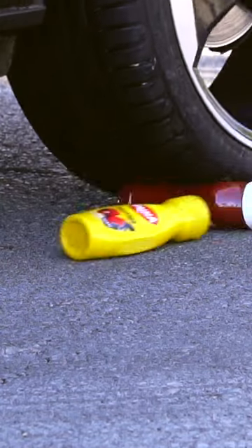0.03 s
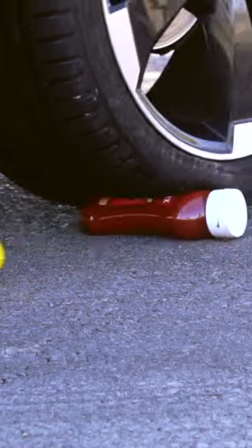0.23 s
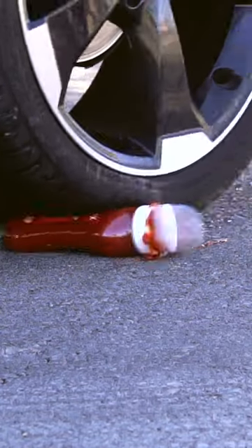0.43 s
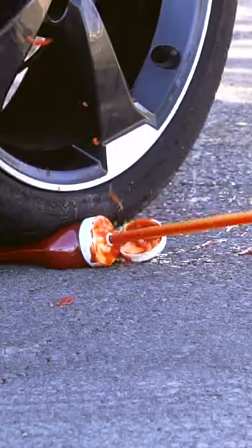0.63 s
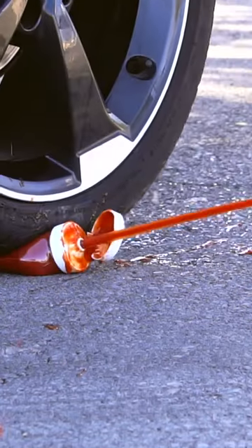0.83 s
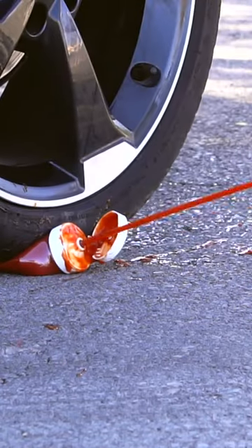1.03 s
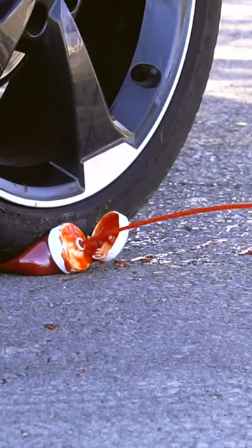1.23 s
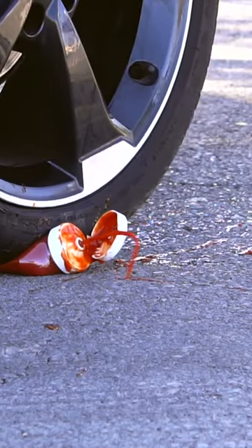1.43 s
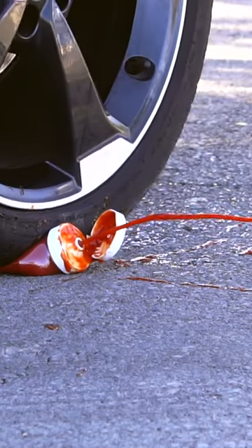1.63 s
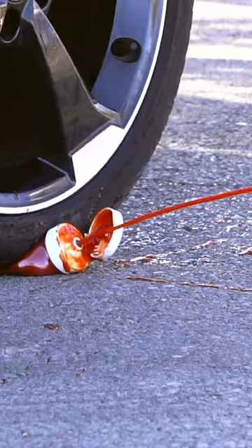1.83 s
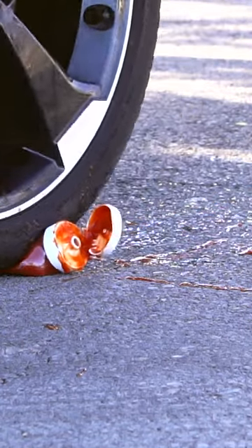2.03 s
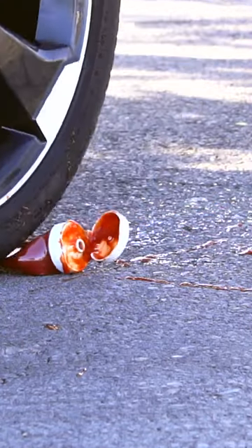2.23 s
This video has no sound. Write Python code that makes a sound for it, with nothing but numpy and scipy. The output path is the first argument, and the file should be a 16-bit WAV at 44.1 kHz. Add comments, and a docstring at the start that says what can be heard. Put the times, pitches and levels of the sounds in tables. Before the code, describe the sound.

Plastic sauce bottles crunch and crack under a slowly rolling tyre, a cap bursts with a rapid loud sputter, sauce splashes to the left, then only faint ticks and drips; close, dry outdoor stereo pickup.

```python
"""Plastic sauce bottles are crushed on asphalt by a slowly rolling car tyre: bursts of clicks excite wall rings.
The walls buckle in short crunches, the cap bursts, air and sauce sputter and spray through the nozzle.
The jet, blobs and drops of sauce splash on the left: grains and click bursts, shadowed on the right.
Filtered grains grind under the tyre over the car's low noise; flattened plastic ticks as the car stops."""
import sys
import numpy as np
from scipy import signal
from scipy.fft import rfft, irfft, next_fast_len
from scipy.io import wavfile

SR = 44100
rng = np.random.default_rng(int(sys.argv[2]) if len(sys.argv) > 2 else 0)


def file_out(sig):
    """Save sig as 16-bit WAV at sys.argv[1]."""
    # one column per channel
    cols = np.atleast_2d(sig).T
    # limit, then scale
    lim = np.clip(cols, -1, 1)
    pcm = np.round(lim * 32767).astype(np.int16)
    wavfile.write(sys.argv[1], SR, pcm)


def decibels_to_gain(level_db):
    """Convert a level in decibels to a linear amplitude gain (20 dB per decade)."""
    exponent = np.asarray(level_db, float) / 20
    return 10 ** exponent


N = 101429

# spectrum of buckling walls, also of squelches and blobs: freq_hz, relative_db
CRUNCH_SPECTRUM = [(88, -61), (150, -14.5), (854, -6), (2180, -3), (3160, -2), (3770, -10.5), (6390, -11.5),
                   (11500, -21), (12700, -21.5), (16000, -25)]
# spectrum of snapping plastic, also of drops: freq_hz, relative_db
SNAP_SPECTRUM = [(300, -23.5), (800, -4), (2000, -4), (4000, 3), (8000, -9.5), (12000, -8), (16000, -9)]
# envelope shared by snaps and drops; rise is a share of the length
SNAP_ENVELOPE = dict(rise=0.051, fall_s=0.00025, tail_db=-5.5, tail_s=0.0061)


def rms_one(x):
    """Scale to rms 1."""
    return x / np.sqrt(np.mean(x ** 2) + 1e-20)


def in_time(rows):
    """Columns of a curve interpolated at every sample."""
    time_s, *columns = np.transpose(rows)
    return [np.interp(np.arange(N) / SR, time_s, column) for column in columns]


def lowpass(x, corner_hz):
    """Second-order Butterworth low-pass."""
    return signal.sosfilt(signal.butter(2, corner_hz, fs=SR, output="sos"), x)


def highpass(x, corner_hz):
    """Second-order Butterworth high-pass."""
    return signal.sosfilt(signal.butter(2, corner_hz, "high", fs=SR, output="sos"), x)


def colour(x, spectrum, treble_db=0):
    """Minimum-phase filter of unit energy; treble_db per octave tilts the top."""
    treble_from_hz = 2100
    hz = np.maximum(np.arange(2049) * SR / 4096, 10)
    point_hz, point_db = np.transpose(spectrum)
    db = np.interp(np.log(hz), np.log(point_hz), point_db)
    db = db + treble_db * np.log2(1 + hz / treble_from_hz)
    # folding the cepstrum makes the filter causal
    cepstrum = irfft(db * np.log(10) / 20)
    cepstrum[1:2048] *= 2
    cepstrum[2049:] = 0
    impulse = irfft(np.exp(rfft(cepstrum)))
    impulse = impulse / np.sqrt(np.sum(impulse ** 2))
    size = next_fast_len(x.shape[-1] + 4096)
    return irfft(rfft(x, size) * rfft(impulse, size), size)[..., :x.shape[-1]]


def resonance(x, hz, width_hz):
    """Two-pole peak that keeps the power of white noise."""
    r = np.exp(-np.pi * width_hz / SR)
    gain = np.sqrt((1 - r * r) / 2)
    return signal.lfilter([gain, 0, -gain], [1, -2 * r * np.cos(2 * np.pi * hz / SR), r * r], x)


def grains(size, spread_db):
    """Dense clicks of uneven size, rms 1."""
    uneven_db = spread_db * np.minimum(rng.exponential(1, size), 5)
    return rms_one(rng.standard_normal(size) * decibels_to_gain(uneven_db))


def drift(rate_hz):
    """Slow random curve of rms 1: noise through two equal low-pass poles."""
    r = np.exp(-2 * np.pi * rate_hz / SR)
    noise = rng.standard_normal(N + SR)
    return rms_one(signal.lfilter([1], [1, -2 * r, r * r], noise)[SR:])


def bursts(events, spectrum, rise, fall_s, tail_db, tail_s, spread_db, ring_db, ring_q, gain_db,
           first_db=-20):
    """Clicks that swell, sag and die with a weaker tail, one click added at the top; coloured and ringing."""
    # wall modes rung by events that have a wall level: freq_hz, width_hz, level_db
    wall_modes = [(780, 48, -10), (923, 160, 3.5)]
    sag_db = -2
    swell_bend = 1.26  # above 1 the swell starts slowly and steepens
    thump_hz, thump_width_hz, thump_db = 100, 24.5, -35.5
    out = np.zeros(N + SR)
    t = np.arange(SR // 6) / SR
    for start_s, level_db, length_s, treble_db, ring_hz, *wall_db in events:
        top_s = rise * length_s
        after_s = np.maximum(t - length_s, 0)
        swell = np.interp(t, [0, top_s, length_s], [0, 1, decibels_to_gain(sag_db)]) ** swell_bend
        decay = np.exp(-after_s / fall_s) + decibels_to_gain(tail_db) * np.exp(-after_s / tail_s)
        shape = swell * decay
        clicks = grains(len(t), spread_db) * shape
        clicks = clicks * np.sqrt(np.sum(shape ** 2) / np.sum(clicks ** 2))
        clicks[int(top_s * SR)] += decibels_to_gain(first_db)
        y = colour(clicks, spectrum, treble_db)
        y = y + decibels_to_gain(ring_db) * resonance(clicks, ring_hz, ring_hz / ring_q)
        if wall_db:
            for mode_hz, width_hz, mode_db in wall_modes:
                y = y + decibels_to_gain(wall_db[0] + mode_db) * resonance(clicks, mode_hz, width_hz)
            # the smooth shape pushes the tyre
            y = y + decibels_to_gain(thump_db) * resonance(shape, thump_hz, thump_width_hz)
        start = int(start_s * SR)
        out[start:start + len(t)] += decibels_to_gain(level_db + gain_db) * y
    return out[:N]


def rumble():
    """The car's low noise through tyre and road, a little wide."""
    # level curve: time_s, level_db
    levels = [(0, -54.5), (.6, -55), (.72, -61), (.8, -45.5), (.9, -55.5), (1.18, -70), (1.55, -76.5),
              (1.85, -70), (2.3, -74.5)]
    # spectrum: freq_hz, relative_db
    car_spectrum = [(15, -54.5), (25, -17), (43, -14.5), (90, 7.5), (162, -3), (215, 3), (300, -0.5),
                    (390, -25), (660, -120)]
    side_db = -14
    mid, side = colour(rng.standard_normal((2, N)), car_spectrum)
    return decibels_to_gain(in_time(levels)[0]) * (mid + decibels_to_gain(side_db) * side * [[1], [-1]])


def tyre():
    """Tyre grinding grit and plastic: dull grains in the middle, bright grains wide, flickering apart."""
    # level curve: time_s, level_db, bright_part_db
    roll = [(0, -47, 0.5), (.57, -51.5, 6), (.63, -49, -0.5), (.71, -52, 4), (.76, -43.5, 1.5),
            (.88, -45.5, -5), (1.05, -53.5, 4.5), (1.2, -57.5, 2), (1.34, -49.5, -6), (1.45, -62.5, -1.5),
            (1.58, -63.5, -2.5), (1.65, -60.5, 2), (1.9, -62.5, -8), (2.3, -65.5, -2.5)]
    # spectrum: freq_hz, relative_db
    grit_spectrum = [(88, -42), (150, -6.5), (578, 4.5), (1340, -6.5), (1720, -6), (3040, -9), (8900, -14),
                     (10200, -12), (14800, -12.5), (16000, -13)]
    wide_from_hz, likeness = 1120, 0.89  # likeness of left and right in the bright part
    level_db, bright_db = in_time(roll)
    mid, side = colour(np.array([grains(N, 1.8), grains(N, 2.8)]), grit_spectrum)
    dull_mid, dull_side = lowpass([mid, side], wide_from_hz)
    bright_mid = np.sqrt((1 + likeness) / 2) * (mid - dull_mid)
    bright_side = np.sqrt((1 - likeness) / 2) * (side - dull_side)
    bright = bright_mid + bright_side * [[1], [-1]]
    dull = dull_mid * decibels_to_gain(2.0 * drift(25))
    return decibels_to_gain(level_db) * (dull + bright * decibels_to_gain(bright_db + 1.0 * drift(50)))


def drops():
    """Single drops tick on the road: very short click bursts with a ring."""
    # start_s, level_db, treble_db, ring_hz
    events = [(1.0755, -27.5, -15, 1400), (1.5985, -40, 3, 3480), (1.782, -45, 2, 3570),
              (1.806, -50.5, 5.5, 4470), (1.842, -48, 1, 2490), (1.9, -52, 0, 3000),
              (1.975, -47, 1.5, 2770), (2.0895, -39, 5, 3190)]
    length_s = 0.0011
    events = [(start_s, level_db, length_s, *rest) for start_s, level_db, *rest in events]
    return bursts(events, SNAP_SPECTRUM, **SNAP_ENVELOPE,
                  spread_db=2.5, ring_db=3.2, ring_q=4.7, gain_db=-16, first_db=10)


def splats():
    """Blobs of sauce land: a strong click in a quick swell, with a ring."""
    # start_s, level_db, length_s, treble_db, ring_hz
    events = [(.833, -21, 0.0048, -7.5, 2770), (.856, -21.5, 0.0077, -1.5, 1220),
              (.857, -24, 0.013, -6, 3340), (.97, -27, 0.058, -3.5, 3260), (1.252, -44, 0.06, -3, 2800),
              (1.596, -41.5, 0.0056, -6, 2380), (1.64, -46.5, 0.014, -3, 4300),
              (2.093, -47.5, 0.018, 4, 4530), (2.15, -47, 0.0067, -3.5, 1770)]
    return bursts(events, CRUNCH_SPECTRUM, rise=0.12, fall_s=0.0086, tail_db=-13.5, tail_s=0.011,
                  spread_db=3.5, ring_db=1.5, ring_q=12.0, gain_db=-15, first_db=15)


def jet():
    """Fine splashing grains, blobs and drops on the left, shadowed right; hollow bottle ring in the middle."""
    # level curve: time_s, level_db, hollow_ring_db
    levels = [(0, -48, -28), (.5, -47.5, -20), (.86, -47.5, -25), (.97, -47.5, -6), (1.06, -52.5, -1.5),
              (1.2, -52, -9.5), (1.35, -54.5, -7.5), (1.43, -62, -21), (1.6, -59, -34), (2, -63.5, -34),
              (2.3, -60.5, -26.5)]
    # spectrum: freq_hz, relative_db
    splash_spectrum = [(180, -28), (300, -17.5), (519, -6.5), (1080, -1.5), (1280, -2.5), (2480, -1.5),
                       (2930, -3), (4230, -7.5), (15000, -18), (16000, -23.5)]
    ring_hz, ring_width_hz = 560, 113
    left_db, shadow_from_hz, right_high_db = 2.5, 377, -11.5
    right_delay_samples = 2
    level_db, ring_db = in_time(levels)
    spray = grains(N, 2.7) * decibels_to_gain(level_db + 2.17 * drift(30))
    left = decibels_to_gain(left_db) * (colour(spray, splash_spectrum) + splats() + drops())
    low = lowpass(left, shadow_from_hz)
    right = np.roll(low + decibels_to_gain(right_high_db) * (left - low), right_delay_samples)
    hollow = decibels_to_gain(ring_db) * resonance(spray, ring_hz, ring_width_hz)
    return np.array([left, right]) + hollow


def squelches():
    """Soft wet squelches: slow swells, broadly ringing."""
    # start_s, level_db, length_s, treble_db, ring_hz
    events = [(.414, -22.5, 0.0012, -11, 1240), (.531, -20, 0.0092, 1.5, 2250), (.547, -20, 0.0094, 0, 700),
              (.573, -20.5, 0.005, -3, 740), (.738, -25.5, 0.014, -6, 915),
              (.7655, -21, 0.0021, -7.5, 1710), (.801, -28.5, 0.0077, -8, 1610),
              (1.601, -49.5, 0.038, -25, 560)]
    return bursts(events, CRUNCH_SPECTRUM, rise=0.35, fall_s=0.0025, tail_db=-12, tail_s=0.014,
                  spread_db=3.0, ring_db=-5.0, ring_q=4.1, gain_db=-12.5)


def sprays():
    """The second, thinner sputter hisses through the narrowed nozzle: bright bursts with a strong click."""
    # start_s, level_db, length_s, treble_db, ring_hz
    events = [(.906, -15.5, 0.0032, -4.5, 2600), (.912, -28, 0.08, 2.5, 6300),
              (.930, -17, 0.006, -5.5, 6400), (.947, -20, 0.01, -1.5, 2760),
              (.983, -18.5, 0.0033, -2.5, 5450), (1.0465, -25, 0.0035, -0.5, 5960),
              (1.118, -31, .002, 2, 7200)]
    # spectrum: freq_hz, relative_db
    spray_spectrum = [(410, -66), (700, -34), (1970, -4.5), (2220, -6), (2770, 2.5), (4260, -16.5),
                      (6230, 3.5), (7110, -4.5), (14600, 3.5), (16000, 0.5)]
    return bursts(events, spray_spectrum, rise=0.21, fall_s=0.0017, tail_db=-9, tail_s=0.035,
                  spread_db=1.0, ring_db=-19, ring_q=12, gain_db=-13.5, first_db=20.5)


def spurts():
    """Air and sauce sputter out: sharp-starting bursts with a strong click."""
    # start_s, level_db, length_s, treble_db, ring_hz
    events = [(.5908, -12, 0.0039, -4.8, 5370), (.5977, -8.5, 0.0018, -1, 1760),
              (.6052, -19, 0.0024, -6, 9410), (.6137, -4, 0.0019, -0.4, 9080),
              (.6217, -8.5, 0.0046, 1.5, 8440), (.6325, -9.5, 0.0022, -3.5, 9300),
              (.6418, -4, 0.0037, 0.5, 9200), (.6555, -10.5, 0.0017, 0, 8800),
              (.669, -16.5, 0.0017, 2, 9500), (.6, -23.5, 0.084, 3, 8990), (.692, -21, 0.0019, -1, 9000),
              (.7065, -22.5, 0.0027, -1, 9160)]
    # spectrum: freq_hz, relative_db
    spurt_spectrum = [(240, -68), (400, -38.5), (1230, -25), (2180, -7), (3870, -12.5), (5190, -6),
                      (12900, -6.5), (16000, -12)]
    return bursts(events, spurt_spectrum, rise=0.083, fall_s=0.0022, tail_db=-11, tail_s=0.017,
                  spread_db=4.0, ring_db=-9.5, ring_q=16.0, gain_db=-14.5, first_db=14.5)


def snaps():
    """Single snaps and ticks of plastic: a sharp click and a loud, short ring."""
    # start_s, level_db, length_s, treble_db, ring_hz
    events = [(.1965, -9.5, 0.0013, -2.5, 3230), (.503, -7, 0.00017, -7, 2190),
              (.5113, -1, 0.00017, 26, 6040), (.5148, -11.5, 0.00015, 31, 3580),
              (.5912, -5, 0.00067, 5, 5460), (.593, -6.5, 0.00059, 15, 1790), (.7183, -9, 0.0007, 8, 8800),
              (.805, -25, 0.00049, 18, 5900), (2.191, -30.5, 0.00095, -26, 830),
              (2.1912, -36.5, 0.0005, -4.5, 2770), (2.2845, -53.5, 0.0012, -2.5, 2520)]
    return bursts(events, SNAP_SPECTRUM, **SNAP_ENVELOPE,
                  spread_db=1.5, ring_db=3.0, ring_q=6.0, gain_db=-15, first_db=14.5)


def crunches():
    """Buckling walls: swelling bursts of cracks that ring the wall and push the tyre."""
    # start_s, level_db, treble_db, ring_hz, wall_ring_db
    events = [(0.052, -9.5, 2.5, 3350, -24), (0.079, -16, -1, 3430, -4.5), (0.1898, -7.5, 4, 3150, -11.5),
              (0.32, -9.5, 0.7, 3100, -44), (0.364, -8, 2.2, 3250, -19.5), (0.394, -11, 0.5, 3200, -13.5),
              (0.4992, -11, 5.5, 2050, -16.5), (0.504, -13, 7, 3297, -17.5), (0.511, -15, 3, 2200, -15)]
    length_s = 0.0069
    events = [(start_s, level_db, length_s, *rest) for start_s, level_db, *rest in events]
    return bursts(events, CRUNCH_SPECTRUM, rise=0.61, fall_s=0.0055, tail_db=-7, tail_s=0.015,
                  spread_db=3.0, ring_db=-10.5, ring_q=19, gain_db=-14)


def bottles():
    """Squeezed plastic: the sum of its crunches, squelches, sputters and snaps."""
    return squelches() + sprays() + spurts() + snaps() + crunches()


def scene():
    """Bottles near the middle with two close, thin echoes; rumble, tyre and sauce around them."""
    # echoes off road and car body: delay_s, left_db, right_db
    echoes = [(.0004, -17, -14), (.0037, -12, -17)]
    pan_db, echo_from_hz = 0.5, 3500  # left over right
    near = bottles()
    out = near * decibels_to_gain([[pan_db / 2], [-pan_db / 2]]) + rumble() + tyre() + jet()
    thin = highpass(near, echo_from_hz)
    for delay_s, *side_db in echoes:
        lag = int(delay_s * SR)
        # opposite sign on the right
        out[:, lag:] += decibels_to_gain(side_db)[:, None] * thin[:-lag] * [[1], [-1]]
    return out


def top_cut(x):
    """Nothing passes above the cut-off."""
    return signal.sosfilt(signal.butter(12, 16990, fs=SR, output="sos"), x)


def record(dry):
    """The microphone loses the deep bass, then a steep filter cuts the top."""
    mic_from_hz, top_hz = 68, 16700
    mix = highpass(dry, mic_from_hz)
    mix = signal.sosfilt(signal.cheby2(12, 60, top_hz, fs=SR, output="sos"), mix)
    return top_cut(mix)


dry = scene()
out = record(dry)
file_out(out)
```